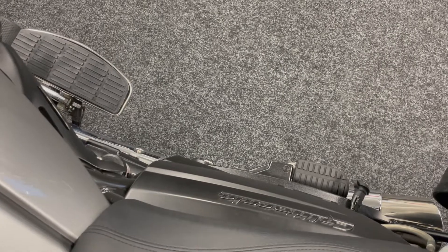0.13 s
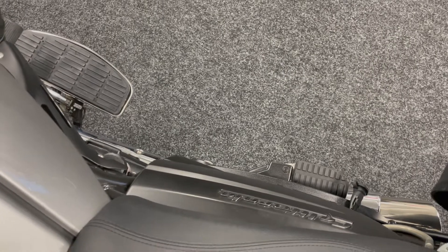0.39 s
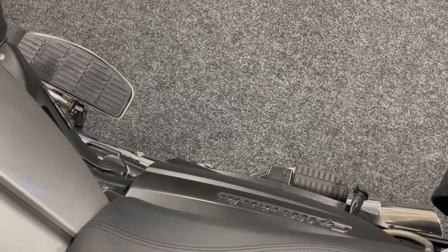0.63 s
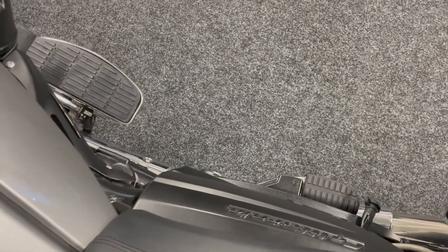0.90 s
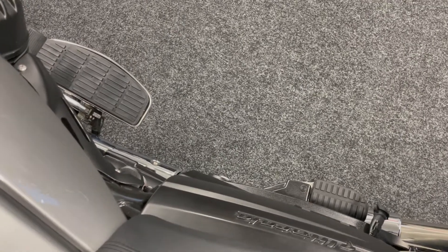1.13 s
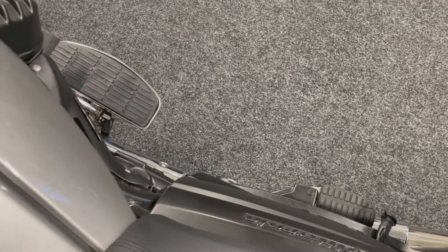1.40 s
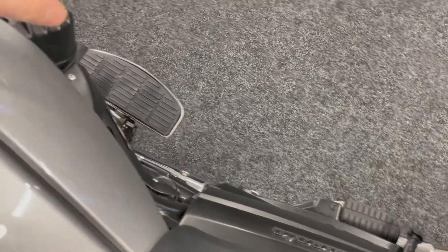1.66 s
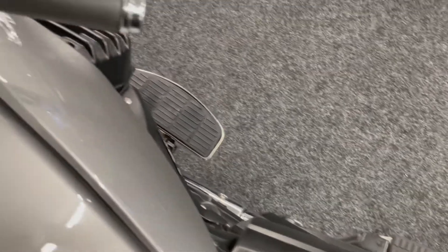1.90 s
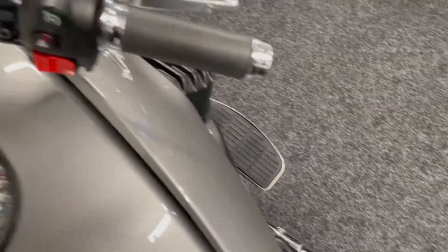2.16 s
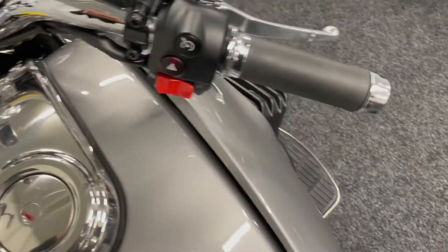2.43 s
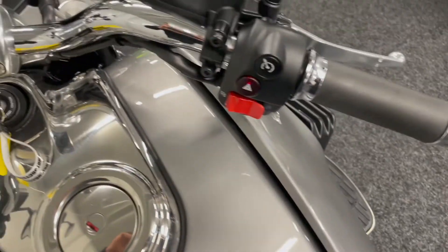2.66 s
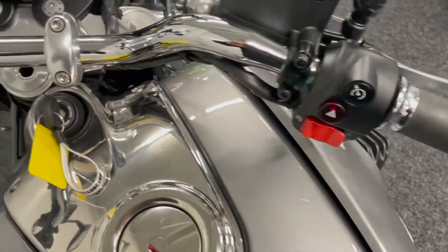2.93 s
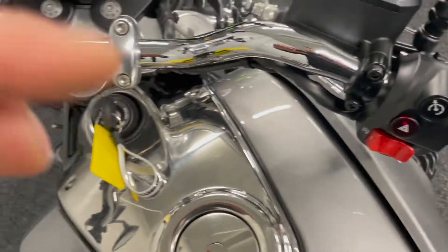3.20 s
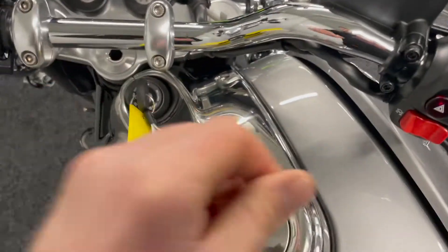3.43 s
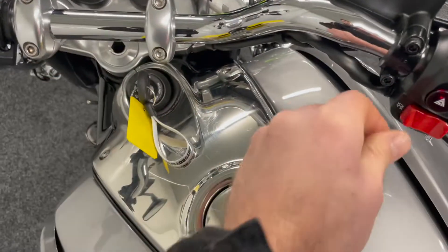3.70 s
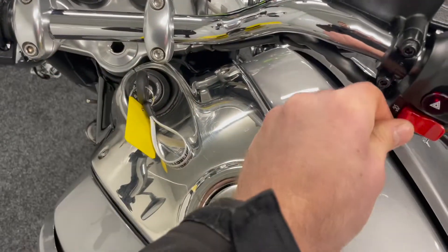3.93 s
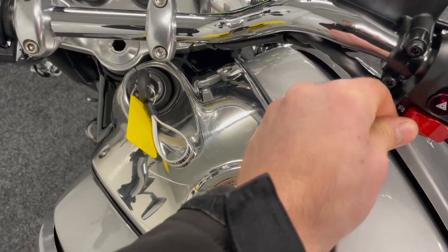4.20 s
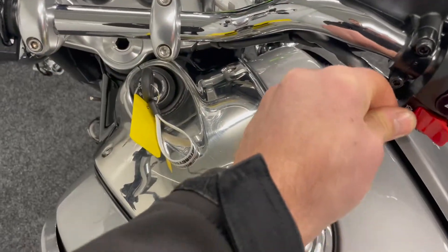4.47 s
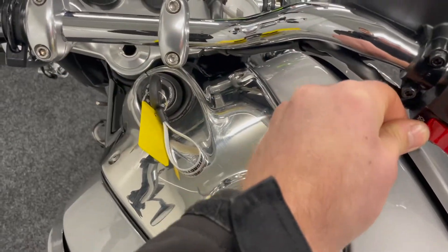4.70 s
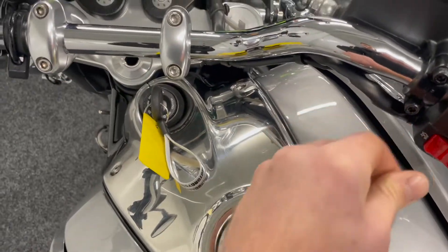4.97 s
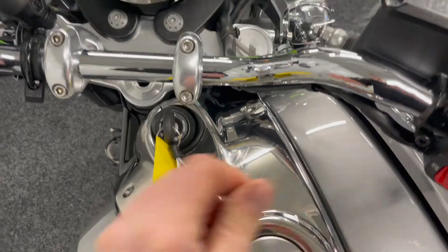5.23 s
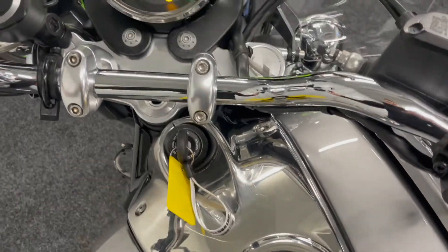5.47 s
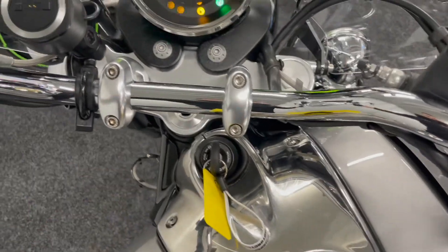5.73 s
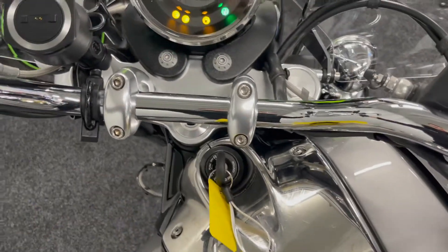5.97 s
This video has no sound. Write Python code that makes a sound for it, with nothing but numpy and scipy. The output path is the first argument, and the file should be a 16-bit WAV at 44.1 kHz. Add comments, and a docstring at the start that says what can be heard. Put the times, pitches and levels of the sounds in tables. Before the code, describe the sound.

A big V-twin motorcycle runs close to a hand-held phone in a carpeted showroom. From 0 s it chugs at a fast idle, deep and uneven, then a throttle blip surges from about 0.25 s, with two hard strokes, peaking near 0.5 s and falling back by 1 s. The speed swells gently around 1.5 s and again near 2.3 s, then slowly settles into a lumpy bass throb. Over it lie dry metallic valve clatter, alternately loud and soft, a breathy mechanical rush and a blurred gear whine, slightly clearer after 2.3 s. At 4.24 s a bright switch-like click snaps. At about 4.65 s ignition cuts: firing collapses into slowing, weakening puffs and dull valve ticks, fading with short room boom until about 5.7 s. Two faint clicks at 5.34 and 5.47 s end a thin treble hiss; only low, quiet room tone remains to 6 s.

```python
"""Carpeted showroom: a big V-twin motorcycle at fast idle blips once, hunts, then its ignition is cut.
Two uneven firings a cycle, as shaft orders, drive pipe and room modes; noise through the modes adds turbulence.
Noise through case resonances makes the valve-gear clatter; blurred shaft multiples make the gear whine.
Around and after the cut come fading puffs, valve ticks and bright clicks; a thin hiss stops at the last click.
A hand-held phone listens close by through two ports."""
import sys
import numpy as np
from scipy import signal
from scipy.fft import rfft, irfft, next_fast_len
from scipy.io import wavfile
from scipy.ndimage import uniform_filter1d, map_coordinates

SR = 44100
rng = np.random.default_rng(int(sys.argv[2]) if len(sys.argv) > 2 else 0)


def persist_wave(psi):
    """Save psi, clipped to +-1, as 16-bit WAV."""
    counts = np.round(np.clip(psi, -1, 1) * 32767).astype(np.int16)
    wavfile.write(sys.argv[1], SR, np.atleast_2d(counts).T)


def convert_level_to_amplitude(level_db):
    """Map a level in decibels to its linear amplitude factor."""
    exponent = np.asarray(level_db, float) / 20
    return 10 ** exponent


N = 269432
T = np.arange(N) / SR

# engine as the phone wanders over it:
# (time [s], firing strength [dB], case ring re idle [dB], whine [dB])
ENGINE_LEVELS = [(0, -2.5, 3, -41), (.5, -2, -2, -40), (.72, 0, -1.5, -42), (.9, -6.5, 0, -45),
                 (1.3, -3.5, -1, -44), (1.6, -4, -2.5, -43), (2.3, -4, 1.5, -36.5), (2.8, -5, 1, -37.5),
                 (3.25, -4.5, 0.5, -35), (4.3, -5.5, 0.5, -37), (4.62, -4, 3, -36)]
# blip, two hunting swings, slow settling: (time [s], engine cycle rate [Hz])
CYCLE_RATE = [(0, 15.8), (.2, 17.4), (.25, 18.9), (.33, 25.5), (.41, 27.6), (.48, 29.6), (.65, 23.8),
              (.8, 20.4), (.93, 16.8), (1.02, 15.9), (1.43, 18.75), (1.6, 19.05), (1.8, 17.3),
              (1.97, 16.16), (2.3, 18.2), (2.47, 18.2), (2.75, 16.6), (3.2, 16.44), (3.8, 15.85),
              (4.3, 15.47), (4.58, 14.96), (4.7, 13.85)]
# engine case resonances: (frequency [Hz], width [Hz], level [dB])
CASE_MODES = [(1030, 97, -1), (1304, 157, 2), (1926, 285, -2.5), (2190, 123, 1), (2360, 89, -2.5),
              (2555, 80, -2), (4300, 400, -17.5), (6240, 450, -15)]
# bright clicks: (time [s], body level [dB], snap level [dB])
CLICKS = [(4.2417, -16, -15.5), (5.34, -41, -52), (5.47, -45, -53)]

CUT_S = 4.65  # ignition off
SECOND_FIRING = 3 / 8  # rear cylinder fires this share of a cycle later
RUNNING = T < CUT_S
SINCE_CUT_S = np.maximum(T - CUT_S, 0)


def unit(x):
    """Scale to rms 1."""
    return x / np.sqrt(np.mean(x ** 2) + 1e-20)


def along(points, hz):
    """Interpolate (Hz, value) points on a log axis."""
    f, v = np.transpose(points)
    return np.interp(np.log(hz + 1), np.log(f + 1), v)


def curves(rows):
    """One value per sample for each column after the time."""
    s, *cols = np.transpose(rows)
    return [np.interp(T, s, c) for c in cols]


def wobble(rate_hz):
    """Smooth random curve, rate_hz knots a second."""
    knots = rng.standard_normal(int(N * rate_hz / SR) + 4)
    return map_coordinates(knots, [T * rate_hz])


def filtered(x, response):
    """x times a complex response of frequency."""
    m = next_fast_len(N + SR // 2)
    return irfft(rfft(x, m) * response(np.fft.rfftfreq(m, 1 / SR)), m)[..., :N]


def modes(rows):
    """Causal response of (Hz, width Hz, dB) resonances, summed with alternating sign."""
    def response(f):
        total = 0
        for k, (c, w, db) in enumerate(rows):
            total = total + (-1) ** k * convert_level_to_amplitude(db) * 1j * f * w / (c * c - f * f + 1j * f * w)
        return total
    return response


def high_pass(hz):
    """Response of two first-order high-passes in series."""
    return lambda f: (1j * f / (hz + 1j * f)) ** 2


def spread(pair):
    """Mix two unrelated signals to left and right with the likeness of the room's sound field."""
    # (frequency [Hz], left-right likeness [0..1])
    likeness = [(60, .96), (150, .94), (300, .62), (600, .25), (1000, .2), (1900, .1), (2600, .4),
                (4500, .45), (7000, .3), (8000, .9), (9200, .9), (10000, .72), (12000, .68), (13000, .97)]

    def mid_side(hz):
        angle = np.arccos(np.clip(along(likeness, hz), -1, 1)) / 2
        return np.array([np.cos(angle), np.sin(angle)])
    mid, side = filtered(pair, mid_side)
    return np.array([mid + side, mid - side])


def noise(patchy_db):
    """Two white noises with shared patches of random gain in time and frequency."""
    z = signal.stft(rng.standard_normal((2, N)), nperseg=512)[2]
    field = uniform_filter1d(rng.standard_normal(z.shape[1:]), 5, 0)
    field = uniform_filter1d(field, 8, 1)
    return signal.istft(z * convert_level_to_amplitude(patchy_db * unit(field)), nperseg=512)[1][:, :N]


def bursts(rows, t60, attack):
    """Envelope of one decaying burst per (s, dB) row; t60 and attack constant in s."""
    start, db = np.array(rows)[:, :1], np.array(rows)[:, 1:]
    late = np.maximum(T - start, 0)
    return np.sum(convert_level_to_amplitude(db - 60 * late / t60) * (1 - np.exp(-late / attack)), 0)


def hall(x):
    """Showroom reverberation: each frequency of a noise tail dies at its own speed."""
    # (frequency [Hz], t60 [s])
    decay_s = [(60, 0.32), (300, 1), (2000, 0.41), (10000, 0.11)]
    hz, t, z = signal.stft(rng.standard_normal((2, SR)), SR, nperseg=256)
    z = z * convert_level_to_amplitude(-60 * t / along(decay_s, hz)[:, None])
    tail = signal.istft(z, SR, nperseg=256)[1]
    delayed = np.pad(x, (700, 0))[None]
    return signal.fftconvolve(delayed, tail / np.linalg.norm(tail[0]), axes=1)[:, :N]


def engine_cycles():
    """Cycles turned: the rate integrated; after the cut the shaft runs down."""
    slowing_hz_per_s = 10.5
    rate_hz = uniform_filter1d(curves(CYCLE_RATE)[0], size=SR // 20)
    rate_hz = rate_hz - slowing_hz_per_s * SINCE_CUT_S
    return np.cumsum(np.maximum(rate_hz, 0)) / SR + .3


CYCLES = engine_cycles()


def firings():
    """Pressure wave of a front and a rear firing a cycle, as shaft orders; no two cycles quite alike."""
    # multiples 1, 2, .. of the cycle rate, every third from 2 stands out: (level [dB])
    order_db = [-10, 0, 0, -6, 0, -11, -8, 0, -10, -5, 0, -13, -3, 0, -11, -7, 0, -5, -9, -4, -11, -9, -8,
                -4, -3, -8, -3, -8]
    wave = np.zeros(N)
    lope = convert_level_to_amplitude(1.2 * np.cos(np.pi * CYCLES) * wobble(2.4))  # alternate cycles burn unequally
    for k, db in enumerate(order_db, 1):
        pair_rad = np.angle(1 + .9 * np.exp(-2j * np.pi * k * SECOND_FIRING))
        level = convert_level_to_amplitude(db + (.45 + .13 * k) * wobble(9))
        wave += level * np.cos(2 * np.pi * k * CYCLES + pair_rad + .016 * k * wobble(12))
    return lope * wave


def pipe(f):
    """Modes of pipe and room, with narrow cancellations between them."""
    # (frequency [Hz], width [Hz], level [dB])
    pipe_modes = [(47.58, 68.4, -21.5), (89, 23.7, -5), (133.83, 13.8, 0), (169.1, 31.8, -11),
                  (212.3, 15.1, -13.5), (230.8, 19.5, -19), (263.7, 14.6, -15.5), (291.2, 15.6, -18.5),
                  (326.6, 17, -21.5), (406.6, 38, -30.5), (533, 390, -42.5)]
    # where reflections cancel: (frequency [Hz], width [Hz], depth [dB])
    cancellations = [(84.5, 9, -20), (111, 14, -14), (147, 10, -12), (190, 10, -12), (223, 8, -14)]
    response = modes(pipe_modes)(f)
    for c, w, db in cancellations:
        detuning = c * c - f * f
        response = response * (detuning + 1j * f * w * convert_level_to_amplitude(db)) / (detuning + 1j * f * w)
    return response


def catches():
    """Envelope of the hard strokes of the blip as the throttle opens."""
    # (time [s], level [dB])
    strokes = [(.28, 9), (.328, 9.5)]
    return bursts(strokes, t60=.11, attack=0.0046)


def exhaust():
    """Firing wave, gas turbulence and unfired puffs through the pipe, with room answer and boom."""
    # gas turbulence in the pipe, strongest around the blip: (time [s], level [dB])
    turbulence = [(0, -22), (.3, -21), (.9, -27), (1.9, -30), (2.7, -33), (4.3, -32), (4.66, -25.5)]
    # unfired strokes: (time [s], level [dB])
    puff_rows = [(4.78, -12), (4.841, -13), (4.909, -10.5), (4.97, -20), (5.069, -21), (5.222, -27),
                 (5.298, -28), (5.439, -39), (5.574, -36)]
    last_burn_s = .04  # decay constant of the charge left at the cut
    catch_db = -6  # share of the hard strokes
    rumble_db, boom_db, fade_db_per_s = -17, -18.5, 40  # after the cut
    gas = noise(patchy_db=2.0)

    puffs = bursts(puff_rows, t60=0.14, attack=0.011)
    thump = convert_level_to_amplitude(20) * np.gradient(puffs) * SR / 100 + convert_level_to_amplitude(14.5) * puffs * gas[0]
    strength = convert_level_to_amplitude(curves(ENGINE_LEVELS)[0]) * (1 + convert_level_to_amplitude(catch_db) * catches())
    burning = np.exp(-SINCE_CUT_S / last_burn_s)
    direct = filtered(strength * burning * firings() + thump, pipe)
    wet = convert_level_to_amplitude(-8) * filtered(hall(direct), high_pass(200))  # deepest bass stays alike at both ports

    fade_db = -fade_db_per_s * (T - CUT_S)
    rumble_level = convert_level_to_amplitude(np.where(RUNNING, curves(turbulence)[0], rumble_db + fade_db))
    rumble = rumble_level * unit(filtered(gas, pipe))
    boom_level = convert_level_to_amplitude(np.where(RUNNING, -120, boom_db + fade_db))
    boom = boom_level * unit(filtered(gas, modes([(45, 16, 0), (423.7, 14, -25.5)])))
    return direct + wet + spread(rumble + boom)


def machinery():
    """Valve gear clacks once a cycle, loud and soft in turn; the case ring also throbs with each firing."""
    # broad mechanical rush: (frequency [Hz], relative level [dB])
    rush_shape = [(250, 0), (450, -4), (800, -12.5), (1500, -19.5), (2800, -15.5), (3500, -20.5),
                  (5500, -26.5), (7500, -27.5), (9000, -24), (12500, -29), (15000, -35.5), (16000, -58)]
    idle_hz, db_per_octave = 16, 10  # clatter grows with speed
    load_db_s_per_hz = -0.01  # and dips slightly while speed rises
    rush_db, coast_rush_db, ring_db, chug_db = -28, -31, -32.5, -42  # before the common level
    catch_ring_db, fade_db_per_s = -6.5, 33.5

    speed_hz = uniform_filter1d(curves(CYCLE_RATE)[0], size=SR // 8)
    load_db = np.clip(load_db_s_per_hz * np.gradient(speed_hz) * SR, -3, 3)
    drive = convert_level_to_amplitude(db_per_octave * np.log2(speed_hz / idle_hz) + load_db)
    level = drive * convert_level_to_amplitude(-fade_db_per_s * SINCE_CUT_S + 0.64 * wobble(6.14))

    throb = np.exp(-5 * (CYCLES % 1)) + np.exp(-5 * ((CYCLES - SECOND_FIRING) % 1))
    phase = (CYCLES + .2) % 1
    clack = 2 * np.exp(-9 * phase) * (1 - np.exp(-phase / .07))
    clack = clack * convert_level_to_amplitude(1.6 * wobble(13) - 6.4 * (CYCLES // 1 % 2))
    # loose contacts, about 120 a second
    taps = (rng.random((2, N)) < 120 / SR) * rng.standard_normal((2, N))

    rush = (1 + 0.71 * clack) * noise(patchy_db=1.5) + 0.24 * unit(taps)
    rush = unit(filtered(rush, lambda f: convert_level_to_amplitude(along(rush_shape, f))))
    rush = convert_level_to_amplitude(np.where(RUNNING, rush_db, coast_rush_db)) * (1 + catches()) * rush

    ring = (1 + 0.43 * throb + 0.58 * clack) * noise(patchy_db=1.5)
    ring = unit(filtered(ring, modes(CASE_MODES)))
    ring_level = convert_level_to_amplitude(ring_db + curves(ENGINE_LEVELS)[1])
    ring = ring_level * (1 + convert_level_to_amplitude(catch_ring_db) * catches()) * ring

    # hollow knock under each clack
    knock = filtered(noise(patchy_db=1.5), modes([(406, 92, 1), (517, 124, -2), (660, 163, -6)]))
    chug = convert_level_to_amplitude(chug_db) * unit(clack) * unit(knock)
    return level * spread(chug + rush + ring)


def whine():
    """Gear teeth mesh at multiples of the shaft; play in the gears blurs the line."""
    # (multiple of the cycle rate, level [dB])
    mesh_orders = [(81, 5.5), (162, -7.5)]
    level = convert_level_to_amplitude(curves(ENGINE_LEVELS)[2] - 99 * SINCE_CUT_S)
    level = level * convert_level_to_amplitude(1.9 * np.cos(2 * np.pi * CYCLES))  # teeth load up with each cycle's firings

    def port():
        total = 0
        for k, db in mesh_orders:
            blur = .4 + wobble(130) + 1j * wobble(130)
            line = np.real(blur * np.exp(2j * np.pi * k * CYCLES))
            total = total + convert_level_to_amplitude(db) * line / np.sqrt(2)
        return total
    return level * spread(np.array([port(), port()]))


def strands():
    """Thin whistles among the case resonances, each swelling once, unsteady in level and phase."""
    # (start [s], end [s], frequency [Hz], level [dB])
    whistles = [(.4, .5, 2310, -23), (1.4, 1.8, 2220, -36), (2.18, 2.68, 2320, -38),
                (2.28, 2.52, 2430, -40), (2.45, 2.82, 2020, -40), (3.65, 4.45, 2540, -40)]

    def port():
        total = 0
        for start, end, hz, db in whistles:
            swell = np.sin(np.pi * np.clip((T - start) / (end - start), 0, 1)) ** .5
            level = convert_level_to_amplitude(db + 1.1 * wobble(25))
            total = total + swell * level * np.sin(2 * np.pi * hz * T + 1.1 * wobble(40))
        return total
    return spread(np.array([port(), port()]))


def ticks():
    """Valve contacts knock the cases dully; the clicks are short bright snaps."""
    # valves seating: (time [s], level [dB])
    seatings = [(4.623, -30), (4.784, -23.5), (4.894, -26), (5.001, -36), (5.063, -29.5), (5.177, -32.5),
                (5.289, -32), (5.43, -35), (5.686, -42.5)]
    hiss = rng.standard_normal((4, N))

    def dull(f):
        return modes(CASE_MODES)(f) / (1 + 1j * f / 2600) ** 3 * high_pass(700)(f)
    valves = bursts(seatings, t60=0.073, attack=0.0022) * unit(filtered(hiss[:2], dull))

    clicks = np.array(CLICKS)
    body = unit(filtered(hiss[2], modes([(3100, 1700, 0.17), (5000, 2500, -2.2)])))
    body = bursts(clicks[:, :2], t60=0.012, attack=0.00076) * body
    snap = unit(filtered(hiss[3], modes([(12000, 6300, 0)])))
    snap = bursts(clicks[:, ::2], t60=0.0098, attack=0.00054) * snap
    click = body + snap
    return spread(valves) + convert_level_to_amplitude(-7.5) * hall(valves[0]) + click + convert_level_to_amplitude(-12) * hall(click)


def pump():
    """Thin resonant treble hiss, likely the fuel pump, until the last click stops it."""
    hiss = unit(filtered(noise(patchy_db=2), modes([(11200, 900, 0), (12600, 60, 6)])))
    return convert_level_to_amplitude(-65 - 900 * np.maximum(T - CLICKS[-1][0], 0)) * spread(hiss)


def room_floor():
    """The quiet of the showroom: steady noise, mostly bass."""
    # (frequency [Hz], relative level [dB])
    floor_shape = [(25, -4.5), (45, 5), (70, -2), (140, -7.5), (320, -17.5), (430, -11), (600, -22.5),
                   (1000, -19), (3000, -55), (16000, -65.5)]
    hush = filtered(noise(patchy_db=1.0), lambda f: convert_level_to_amplitude(along(floor_shape, f)))
    return convert_level_to_amplitude(-57) * spread(unit(hush))


def scene():
    """Engine layers over the quiet of the showroom."""
    return exhaust() + machinery() + whine() + strands() + ticks() + pump() + room_floor()


def roll_off(x):
    """The treble ends steeply here."""
    return signal.sosfilt(signal.butter(12, 15740, fs=SR, output="sos"), x)


def record(dry):
    """The phone's two ports hear the treble out of step; bass is cut and peaks softly clipped."""
    # (frequency [Hz], left lead [rad], left minus right [dB])
    port_offsets = [(0, 0, 0), (2200, 0, -.8), (3400, .7, 2), (5100, .7, 4.5), (5900, -1.3, 3),
                    (6900, -1.4, 2), (7600, -2.9, 1), (9000, -3.2, 0), (11000, -4.7, .5),
                    (13000, -2 * np.pi, 0)]
    hz, lead_rad, db = np.transpose(port_offsets)

    def ports(f):
        half = np.exp(.5j * np.interp(f, hz, lead_rad)) * convert_level_to_amplitude(np.interp(f, hz, db) / 2)
        return np.array([half, 1 / half]) * high_pass(25)(f)
    x = filtered(dry, ports)
    mix = x / (1 + np.abs(x / 0.92) ** 6) ** (1 / 6)
    return roll_off(mix)


dry = scene()
out = record(dry)
persist_wave(out)
```